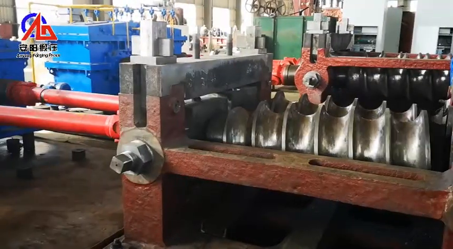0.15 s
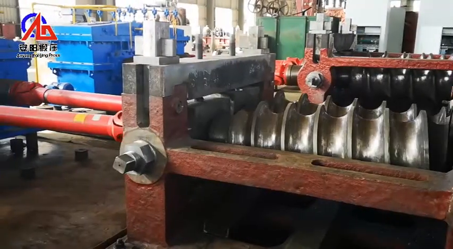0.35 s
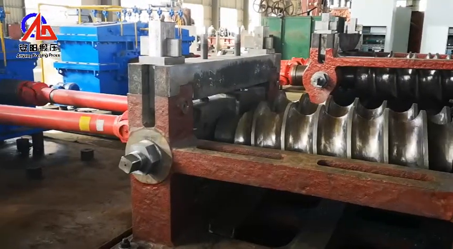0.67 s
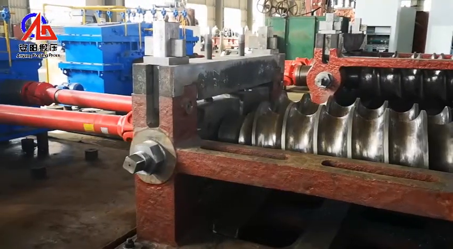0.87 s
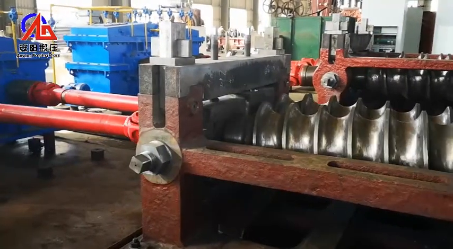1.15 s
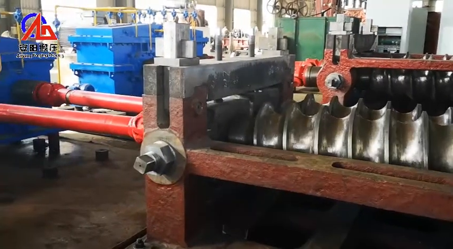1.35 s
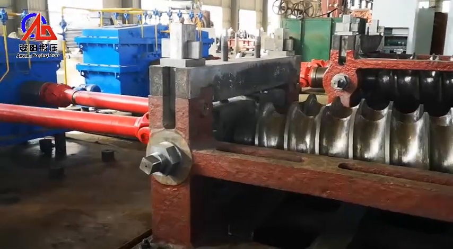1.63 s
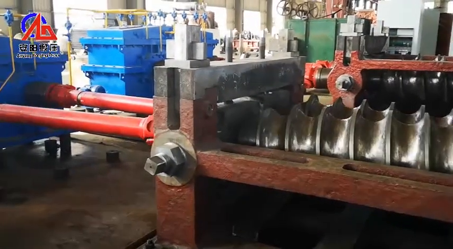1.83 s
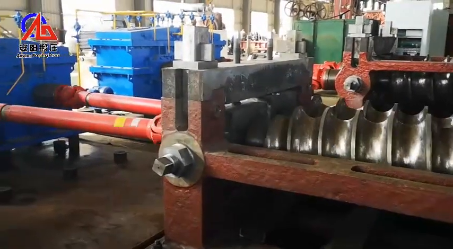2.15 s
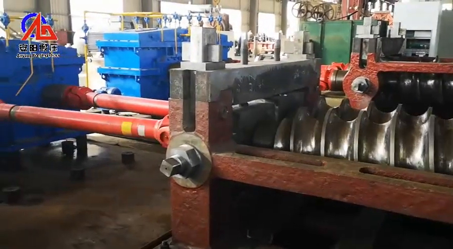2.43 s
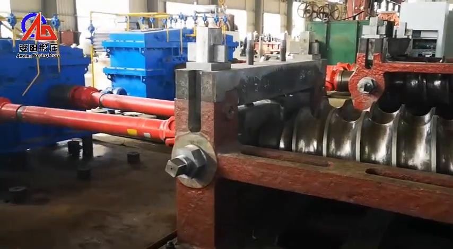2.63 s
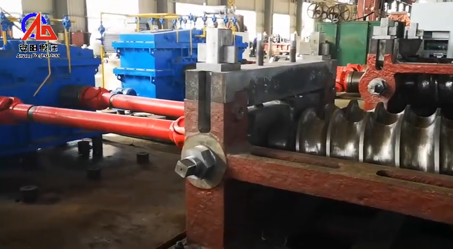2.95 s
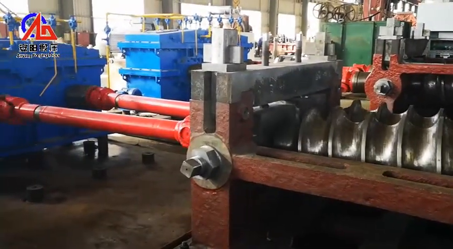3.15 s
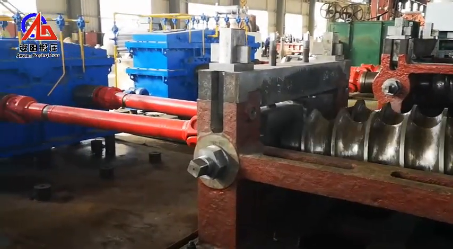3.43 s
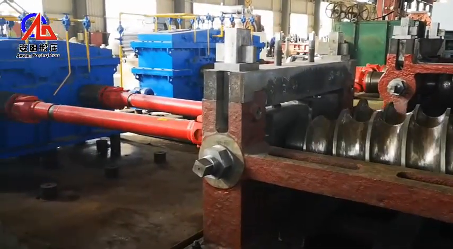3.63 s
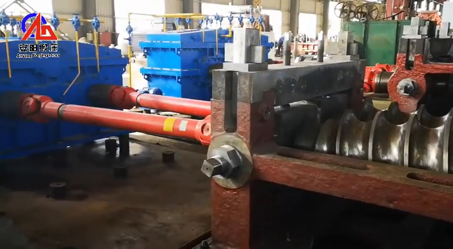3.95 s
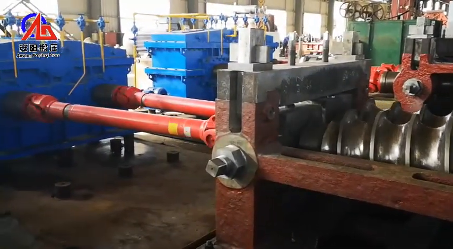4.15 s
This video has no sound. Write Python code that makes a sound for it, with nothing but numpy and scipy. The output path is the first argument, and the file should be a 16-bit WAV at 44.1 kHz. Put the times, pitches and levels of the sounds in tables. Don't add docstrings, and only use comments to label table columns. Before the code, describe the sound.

Continuous heavy machine drone in a reverberant factory hall, heard in wide stereo. The bass rumble eases within half a second, leaving a dense roar with mains hum, buzz and a piercing but modest whine. Worn gears knock irregularly to the right, roughly four times each second, with short hall tails. On the left a faint unsteady whistle wavers, and metal squeaks barely surface near the beginning and again later.

```python
import sys
import numpy as np
from scipy import signal
from scipy.fft import rfft, irfft, next_fast_len
from scipy.io import wavfile

SR = 44100
rng = np.random.default_rng(int(sys.argv[2]) if len(sys.argv) > 2 else 0)


def digitize_waveform(pressure):
    field = np.atleast_2d(pressure).T
    bounded = np.clip(field, -1, 1)
    quanta = np.round(bounded * 32767).astype(np.int16)
    wavfile.write(sys.argv[1], SR, quanta)


def elevation(decibels):
    levels = np.asarray(decibels, float)
    return 10 ** (levels / 20)


N = 189056
T = np.arange(N) / SR
SIZE = next_fast_len(N + SR)
HZ = np.maximum(np.arange(SIZE // 2 + 1) * SR / SIZE, 1)
MAINS_HZ, WHINE_HZ = 49.99, 1155.8


def ports(left, right):
    return np.array([[left], [right]])


def in_time(rows):
    s, *columns = np.transpose(rows)
    return np.array([np.interp(T, s, c) for c in columns])


def in_hz(rows):
    hz, *columns = np.transpose(rows)
    return np.array([np.interp(np.log(HZ), np.log(hz), c) for c in columns])


def drift(rate_hz, count=1):
    r = np.exp(-128 * np.pi * rate_hz / SR)
    noise = rng.standard_normal((count, N // 64 + 2002))
    slow = signal.lfilter([1], [1, -2 * r, r * r], noise)[:, 2000:]
    slow /= slow.std(axis=1, keepdims=True)
    at = np.arange(N) / 64
    return np.array([np.interp(at, np.arange(len(s)), s - s.mean()) for s in slow])


def standing(rows):
    level_db, approach, share, null_s, period_s = np.transpose(rows)[:, :, None]
    beat = np.abs(1 - share * np.exp(2j * np.pi * (T - null_s) / period_s))
    return level_db + approach * (T - T.mean()) + 20 * np.log10(beat + .03)


def tone(hz, level_db, wobble_db, lead=0):
    phase = 2 * np.pi * (np.cumsum(hz + 0 * T) / SR + rng.random()) + ports(0, 1) * lead
    wander = drift(2.5, count=2 if np.mean(hz) > 400 else 1)
    return np.sqrt(2) * elevation(level_db + wobble_db * wander) * np.sin(phase)


# pitch_hz, likeness [0-1], phase_lead_rad
PORT_LIKENESS = [(25, .9995, 0), (70, .997, -.03), (130, .982, -.1), (200, .945, -.25), (340, .91, -.3),
                 (450, .14, -1.5), (560, .45, -2.4), (800, .36, -1.6), (1090, .68, -1.1), (1350, .3, -.5),
                 (1800, .1, 1.5), (2200, .35, 2.6), (2750, .25, 3.8), (3350, .5, 6.4), (4200, .22, 4.0)]


def port_noise(extra_likeness):
    left, own = rfft(rng.standard_normal((2, SIZE))) * np.sqrt(SR / 2)
    alike, lead = in_hz(PORT_LIKENESS)
    alike = np.clip(alike + extra_likeness * (1 - alike), 0, 1)
    right = alike * np.exp(1j * lead) * left + np.sqrt(1 - alike ** 2) * own
    return np.array([left, right])


# pitch_hz, left_db, right_db [dB per Hz]
ROAR_COLOUR = [(20, -69.5, -62.5), (65, -62.5, -63), (140, -58, -62), (301.3, -59.5, -55),
               (359, -67.5, -66), (566, -69.5, -73), (1370, -74, -73), (1800, -70, -68), (2653, -72.5, -64),
               (3190, -83, -74), (3760, -81.5, -87), (6300, -90, -93.5), (7640, -87.5, -98.5),
               (9520, -101.4, -112.3)]
# pitch_hz, left_db, right_db [dB added to the colour]
TREBLE_SHAPE = [(8050, 0, 0), (8250, 0, -6), (9300, 0, 2.5), (9600, -1, 4), (9850, -10.5, 4),
                (11000, -13, 1.5), (11500, -14, -1), (14000, -14, -1)]
# pitch_hz, width_hz, left_db, right_db [dB over the roar]
RESONANCES = [(47, 14, 1.5, 4.5), (94, 5.8, 5.5, -4), (154.4, 44, 6.5, 4.5), (210.6, 10.8, 6.5, 2),
              (325.2, 15.7, 10, 6.5), (406.5, 19, 7, 4), (488, 9, -1, 6), (517, 2.2, 8.5, 6),
              (728, 9.4, 7.5, 2.5), (1102, 25, 5.5, 5.5), (1796, 66, 3.5, 4), (1860, 47, 1, 2),
              (3400, 75, -2, 4.5)]


def roar(patchy_db, together_db):
    lift = 0
    for hz, width_hz, l_db, r_db in RESONANCES:
        lift = lift + (elevation(ports(l_db, r_db)) ** 2 - 1) / (1 + (2 * (HZ - hz) / width_hz) ** 2)
    shape = elevation(in_hz(ROAR_COLOUR) + in_hz(TREBLE_SHAPE)) * np.sqrt(np.maximum(1 + lift, .1))
    shape[1, HZ < 280] = shape[0, HZ < 280]
    spectrum = port_noise(0) * shape
    near_db, settles_s, gear_db, hiss_db = 3.1, .48, -.3, -1
    rumble_db = near_db / (1 + (T / settles_s) ** 4)
    octave, together, out = np.log2(HZ / 20), drift(13.0)[0], 0
    for k in range(11):
        share = np.cos(np.pi / 2 * np.clip(octave - k, -1, 1))
        load_db = rumble_db if k < 5 else gear_db if k < 8 else hiss_db
        gain = elevation(load_db + patchy_db * drift(7.8)[0] + together_db * together * (k > 5))
        out = out + gain * irfft(spectrum * share, SIZE)[:, :N]
    return out


def mains_buzz(level_db, spread_db, odd_db, width_hz):
    k = np.round(HZ / MAINS_HZ).astype(int)
    multiples = np.arange(k.max() + 1)
    lines_db = level_db + spread_db * rng.standard_normal((2, len(multiples))) + odd_db * (multiples % 2)
    comb = elevation(lines_db[:, k]) / (1 + (2 * (HZ - k * MAINS_HZ) / width_hz) ** 2) * (k > 6)
    rising = np.sqrt(np.clip(HZ / 4500, 0, 1))
    colour = elevation(in_hz(ROAR_COLOUR) + in_hz(TREBLE_SHAPE))
    return irfft(port_noise(0.41) * comb * rising * colour, SIZE)[:, :N]


# level_db, approach [dB per s], reflection_share [0-1], cancelling_s, cancelling_period_s
HUM_LINES = [
    (-35.98, -0.07, 0.18, 0.7, 2.04),
    (-35.46, -2.3, 0.4, 1.04, 6.49),
    (-36.38, -1.29, 0.97, 1.33, 7.91),
]
# pitch_hz, left_db, right_db
WINDING_LINES = [(25.0, -41, -41), (45.8, -44, -44), (50.0, -46, -46), (1399.7, -61, -62),
                 (1499.7, -55, -57), (1799.6, -53, -54), (1999.6, -58, -52), (3668, -66, -66),
                 (4323.3, -71, -75), (4599, -67, -74), (4923.2, -66, -82), (5199, -70, -87)]


def hum():
    out = 0
    for k, level_db in zip((3, 5, 6), standing(HUM_LINES)):
        out = out + tone(k * MAINS_HZ, level_db - .5, wobble_db=1.2)
    for hz, l_db, r_db in WINDING_LINES:
        lead = rng.uniform(-3, 3) * (hz > 400)
        out = out + tone(hz, ports(l_db, r_db), 1.5, lead)
    return out


# level_db, approach [dB per s], reflection_share [0-1], cancelling_s, cancelling_period_s
WHINE_LINES = [
    (-44.47, -1.1, 0.28, 0.25, 1.82),
    (-44.4, 0.31, 0.37, -0.27, 1.72),
    (-54.41, 2.62, 0.86, 1.16, 3.92),
    (-60.97, 6.2, 0.97, 4.88, 12.0),
]
# before_rad, after_rad, moment_s, flip_s
WHINE_FLIPS = [
    (2.5, 1.2, 3.05, .2),
    (1.3, 3.1, 1.0, .15),
]
HIGH_LINES = [
    (-65.25, -0.5, 0.43, 4.5, 3.75),
    (-63.86, -0.17, 0.15, 1.46, 3.27),
    (-72.45, -2.17, 0.27, 2.09, 3.16),
]
HIGH_RIGHT = -8, -22, -10
# multiple, left_db, right_db, facing_s, passing_s
BEAMED_ORDERS = [(5, -74, -82, 2, 20), (9, -93, -88.5, 3.5, 8), (10, -100, -88.5, 1.8, 1.1),
                 (11, -91, -90.5, 1.9, 1.4), (12, -102, -94.5, 2.5, 5)]
# start_s, pitch_hz, left_db
WHISTLE_CURVE = [(0, 7337, -58), (.4, 7328, -61), (.72, 7337, -59), (.97, 7332, -55), (1.08, 7331, -66),
                 (1.25, 7333, -59), (1.55, 7340, -72), (1.75, 7334, -56), (2.13, 7334, -60),
                 (2.27, 7351, -58), (2.52, 7352, -57), (2.72, 7330, -61), (3.02, 7330, -55),
                 (3.18, 7336, -72), (3.45, 7341, -63), (3.8, 7333, -60), (4.1, 7331, -55),
                 (4.29, 7334, -58)]


def whine():
    levels_db = standing(WHINE_LINES)
    second, fourth = (a + (b - a) * (1 + np.tanh((T - s) / flip_s)) / 2 for a, b, s, flip_s in WHINE_FLIPS)
    out = tone(2 * WHINE_HZ, levels_db[:2], .6, lead=second)
    out += tone(4 * WHINE_HZ, levels_db[2:], .8, lead=fourth)
    for k, l_db, r_db, s, passes_s in BEAMED_ORDERS:
        level_db = ports(l_db, r_db) - 6 * ((T - s) / passes_s) ** 2
        out += tone(k * WHINE_HZ, level_db, 2.0, np.pi * (k % 4 > 0))
    for k, l_db, r_db in zip((6, 7, 8), standing(HIGH_LINES), HIGH_RIGHT):
        out += tone(k * WHINE_HZ, l_db + ports(0, r_db), 1.2, np.pi * (k % 4 > 0))
    whistle_hz, whistle_db = in_time(WHISTLE_CURVE)
    return out + tone(whistle_hz + 1.5 * drift(6.0)[0], whistle_db + ports(0, -13), 1.0)


# middle_s, pitch_hz, width_hz, length_s, left_db
SQUEAK_EVENTS = [
    (.787, 5780, 60, .012, -65),
    (.79, 7900, 700, .025, -60),
    (.86, 6950, 300, .025, -63),
    (3.30, 3700, 50, .03, -60),
]


def squeaks():
    out = np.zeros(N)
    for s, hz, width_hz, length_s, level_db in SQUEAK_EVENTS:
        span = slice(int((s - .15) * SR), int((s + .15) * SR))
        edges_hz = [hz - width_hz / 2, hz + width_hz / 2]
        sos = signal.butter(2, edges_hz, "band", fs=SR, output="sos")
        band = signal.sosfilt(sos, rng.standard_normal(span.stop - span.start))
        swell = np.exp(-((T[span] - s) / length_s) ** 2)
        out[span] += elevation(level_db) * band / band.std() * swell
    return out * elevation(ports(0, -12.0))


# start_s, peak_db, ring_hz
KNOCK_EVENTS = [(0.2184, -26, 3140), (0.4594, -39, 3130), (0.6943, -27, 3130), (0.9742, -20.5, 3250),
                (1.0864, -31, 3430), (1.2244, -26.5, 3080), (1.2494, -35, 3230), (1.3319, -33, 3100),
                (1.5274, -24.5, 3430), (1.5678, -30.5, 3400), (1.7645, -27, 3420), (1.8068, -33.5, 3430),
                (2.0447, -26.5, 3390), (2.3186, -26, 3300), (2.367, -28.5, 3400), (2.5641, -26, 3170),
                (2.7801, -30, 3300), (2.9198, -28.5, 3460), (3.021, -29.5, 3170), (3.3294, -34, 3420),
                (3.5673, -30, 3330), (3.8294, -34, 3400), (4.0487, -25, 3430), (4.09, -30, 3400)]
# pitch_hz, level_db
GEAR_CASE = [(700, -20), (1090, -6), (1400, -10), (1900, 1.5), (2600, 3), (3300, -1), (3700, -8),
             (4200, -19), (6000, -38), (9000, -60)]


def knocks(level_db, ring_db, ring_width_hz, left_db, rise_s, fall_s, tail_db, tail_s):
    body = irfft(port_noise(0.34) * elevation(in_hz(GEAR_CASE)), SIZE)[:, :N]
    out = np.zeros((2, N))
    for s, peak_db, hz in KNOCK_EVENTS:
        i = max(int((s - rise_s) * SR), 0)
        t = T[:min(SR // 3, N - i)]
        decay = np.exp(-t / fall_s) + elevation(tail_db) * np.exp(-t / tail_s)
        burst = (1 - np.exp(-(t / rise_s) ** 2)) * decay
        part = body[:, i:i + len(t)]
        r, w = np.exp(-np.pi * ring_width_hz / SR), 2 * np.pi * hz / SR
        plate = signal.lfilter([1 - r, 0, r - 1], [1, -2 * r * np.cos(w), r * r], part)
        strength = np.sqrt(np.sum((burst * plate) ** 2) / np.sum(burst ** 2))
        knock = burst * (part + elevation(ring_db) * plate) / strength
        out[:, i:i + len(t)] += elevation(peak_db + level_db) * knock
    return out * elevation(ports(left_db, 0))


def scene():
    hall = roar(patchy_db=.8, together_db=.5)
    buzz = mains_buzz(level_db=9.5, spread_db=2.0, odd_db=-2.5, width_hz=1.5)
    gears = knocks(level_db=-11.0, ring_db=4.0, ring_width_hz=160, left_db=-8.5,
                   rise_s=.006, fall_s=.015, tail_db=-13.0, tail_s=.09)
    return hall + buzz + hum() + whine() + squeaks() + gears


def starved_top(x):
    starved_hz, floor_db = 8100, -91
    padded = np.pad(x, ((0, 0), (0, 4096)), "reflect")
    hz, _, cells = signal.stft(padded, SR, "cosine", nperseg=2048, boundary="even")
    kept = (hz[:, None] < starved_hz) | (np.abs(cells) > elevation(floor_db))
    return signal.istft(cells * kept, SR, "cosine", nperseg=2048)[1][:, :N]


def roll_off(x):
    return signal.sosfilt(signal.butter(12, 13900, fs=SR, output="sos"), x)


def record(dry):
    cut_s, cut_db, fade_out_s, fade_in_s = .026, -15, .004, .014
    dip = elevation(np.interp(T, [cut_s - fade_out_s, cut_s, cut_s + fade_in_s], [0, cut_db, 0]))
    return roll_off(starved_top(dry) * dip)


dry = scene()
out = record(dry)
digitize_waveform(out)
```